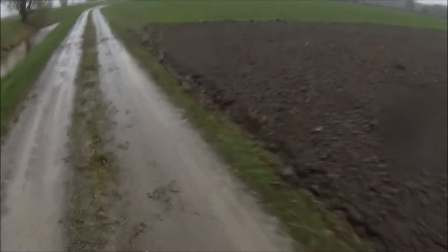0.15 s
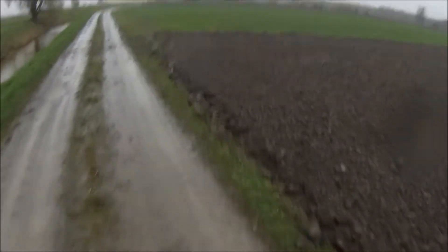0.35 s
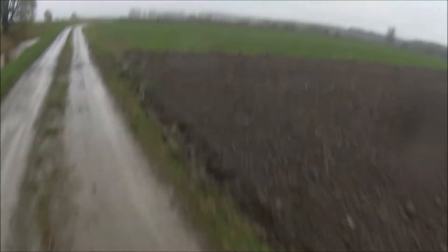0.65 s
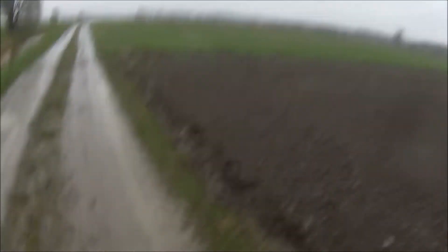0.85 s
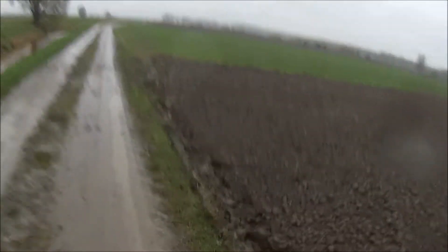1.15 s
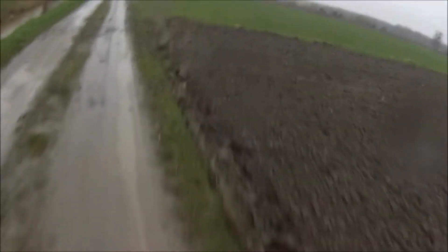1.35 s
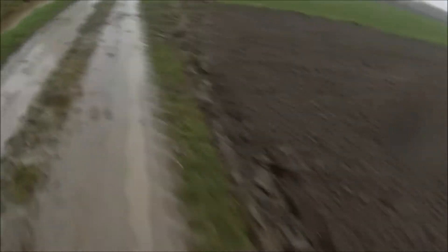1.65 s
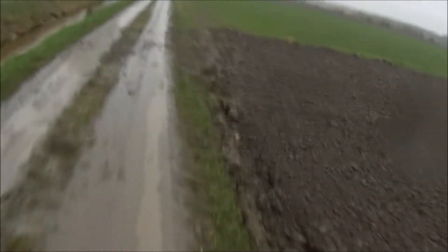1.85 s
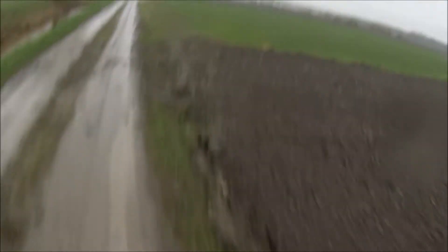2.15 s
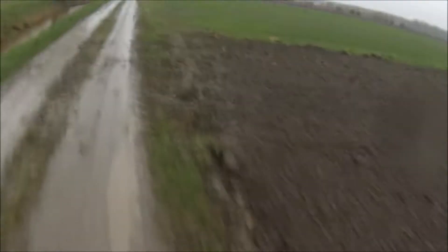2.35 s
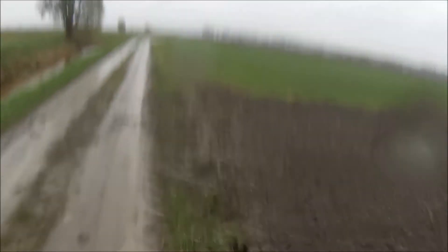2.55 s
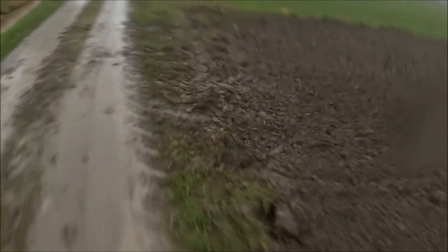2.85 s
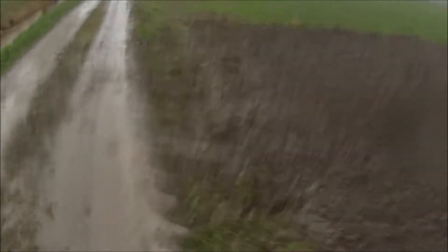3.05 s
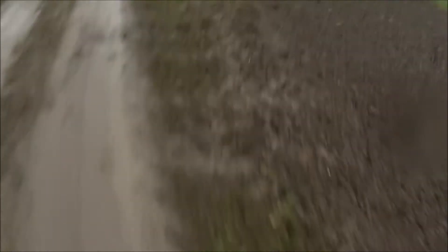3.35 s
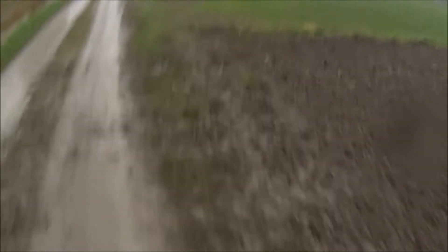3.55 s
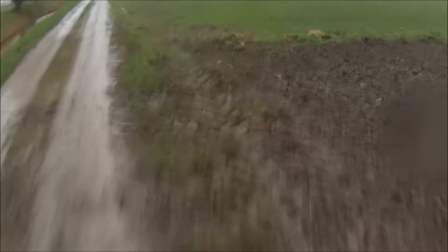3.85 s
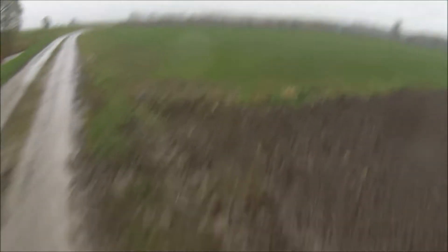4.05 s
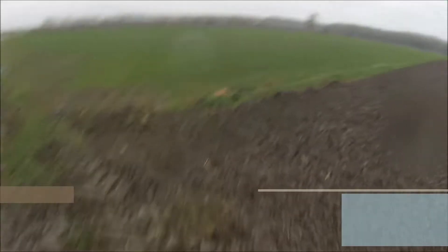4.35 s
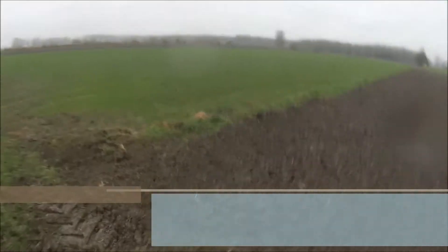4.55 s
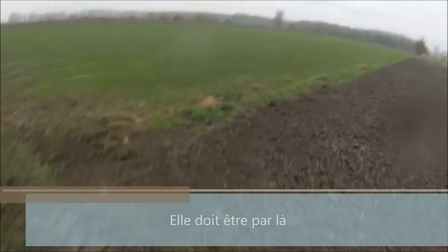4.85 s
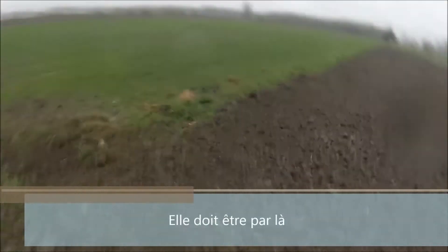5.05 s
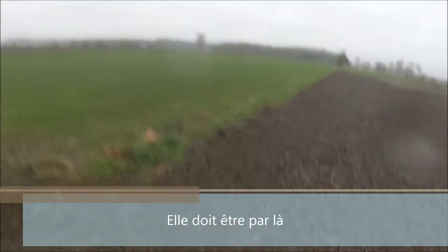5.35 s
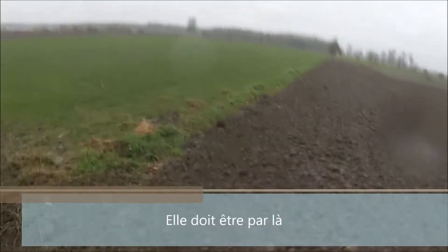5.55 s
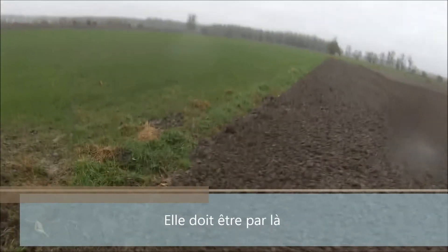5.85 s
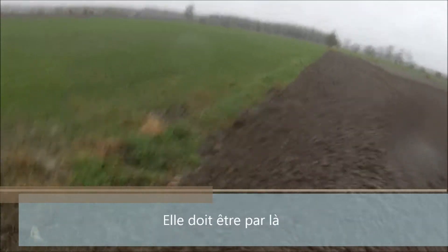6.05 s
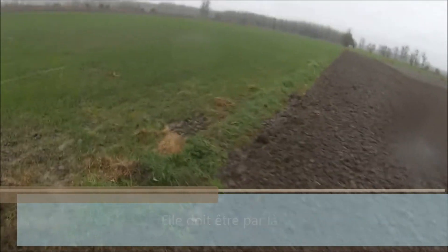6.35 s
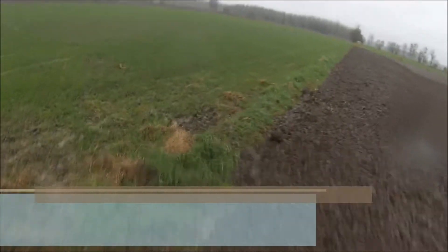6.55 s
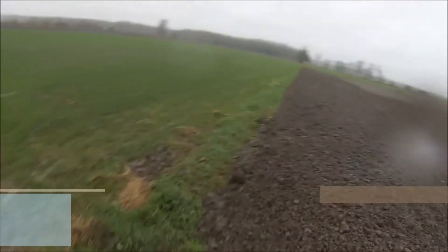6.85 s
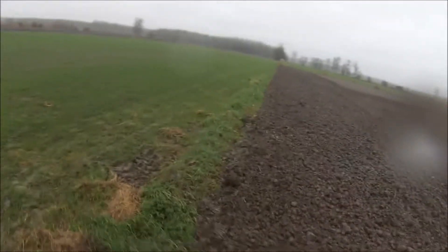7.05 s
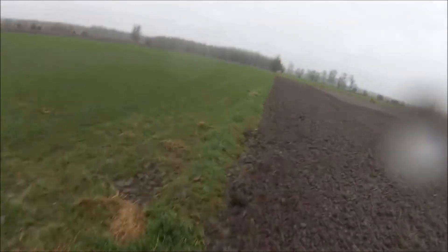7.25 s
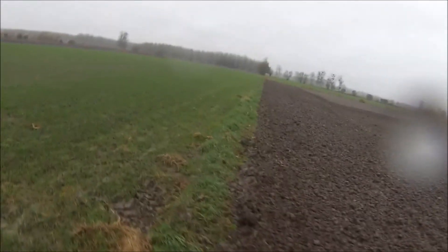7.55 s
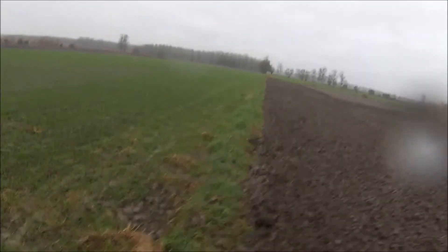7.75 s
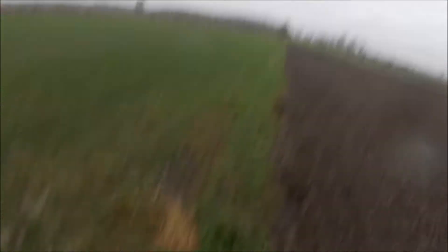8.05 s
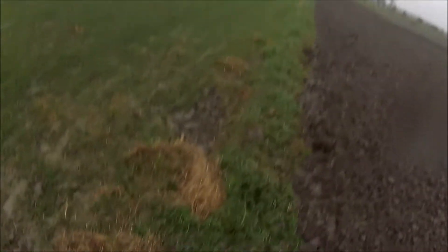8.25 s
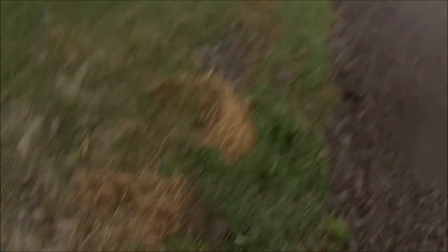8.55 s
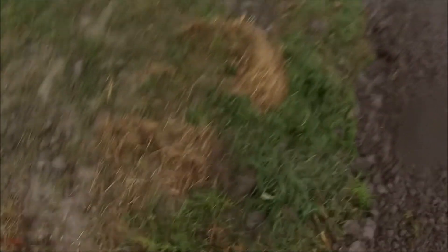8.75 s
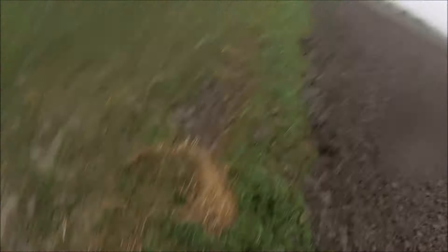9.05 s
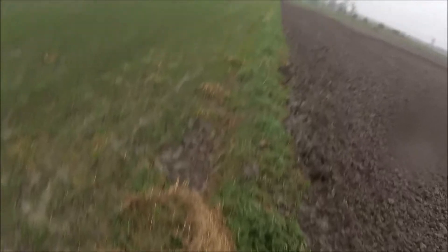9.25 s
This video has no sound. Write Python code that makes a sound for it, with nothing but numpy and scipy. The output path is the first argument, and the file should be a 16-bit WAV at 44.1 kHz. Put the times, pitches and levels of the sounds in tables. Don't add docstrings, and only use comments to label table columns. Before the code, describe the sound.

Microphone sealed inside a small plastic housing worn by a runner on a wet farm track. Deep, pressure-like footfall thuds come almost three a second, with muffled cloth rustle, low wind and dull wet grit. Raindrops tick, knock and crack very close on the shell. After about five seconds the steps slow and soften, then stop; hard isolated drops continue over faint hiss.

```python
import sys
import numpy as np
from scipy import signal
from scipy.fft import rfft, irfft
from scipy.io import wavfile
from scipy.ndimage import uniform_filter1d

SR = 44100
rng = np.random.default_rng(int(sys.argv[2]) if len(sys.argv) > 2 else 0)


def output_pcm(signal):
    pcm = np.clip(np.atleast_2d(signal).T, -1, 1) * 32767
    wavfile.write(sys.argv[1], SR, np.round(pcm).astype(np.int16))


def boost(x):
    u = np.asarray(x, float) / 20
    return 10 ** u


N = 415422

# frequency in Hz, level in dB per Hz.
HISS_COLOUR = [(59, -24), (100, 3.5), (138, -2.5), (389, -13.5), (424, -13), (818, -15), (872, -14.5),
               (1420, -11.5), (14700, -32), (16000, -38)]
# time in seconds, level in dB against a full run.
EFFORT = [(0.0, -15), (0.21, -7.5), (1.21, -2), (1.7, -9), (2.2, 0.52), (2.6, 0), (3.25, -1.5), (3.88, -7),
          (4.69, -5.5), (6.2, -9), (6.6, -22), (7.34, -23), (7.69, -8), (8.3, -23), (9.42, -24)]
# time in seconds, level in dB, spread in seconds.
LURCHES = [
    (0.02, -32.5, 0.037),
    (1.6, -26.5, 0.034),
    (2.3, -44, .2),
    (4.98, -71, 0.053),
    (5.5, -29, 0.061),
    (6.06, -33.5, 0.043),
    (6.58, -36, 0.055),
    (7.15, -39, 0.086),
    (7.9, -54.5, 0.18),
    (9.0, -55, 0.31),
]
# start in seconds, depth of the pressure dip in dB, swing in Hz, rebound delay in seconds.
STEPS = [(0.073, -6.5, 41, 0.04), (0.446, -16.5, 26.3, 0.051), (0.824, -11, 34.5, 0.06),
         (1.208, -14.5, 29.3, 0.059), (1.582, -8.5, 38.3, 0.045), (1.94, -14.5, 36.4, 0.091),
         (2.31, -10, 34, 0.052), (2.695, -8, 36.8, 0.039), (3.065, -12.5, 32, 0.058),
         (3.423, -21, 34.4, 0.072), (3.8, -12.5, 35.6, 0.033), (4.195, -9.5, 35, 0.036),
         (4.608, -6.5, 33.5, 0.036), (5.03, -12, 42, 0.023), (5.494, -29.5, 35.4, 0.055),
         (5.983, -16.5, 32.5, 0.037), (6.506, -31, 41.7, 0.05), (7.023, -28.5, 41.2, 0.072),
         (7.088, -32.5, 21, 0.055), (7.713, -32.5, 29, 0.037), (8.231, -38, 39, 0.029)]
# mode in Hz, level in dB, 60 dB decay in seconds.
KNOCK_MODES = [(1298, -9.5, 0.0036), (1654, 0.5, 0.0078), (2060, -13, 0.012), (2399, 1.5, 0.0033),
               (2720, 2, 0.0046), (3300, -15.5, 0.0011)]
# mode in Hz, level in dB, 60 dB decay in seconds.
CRACK_MODES = [(3900, 7.5, 0.0051), (4176, 8.5, 0.0057), (5640, 14, 0.0017), (6905, 12, 0.0017),
               (6980, 8.5, 0.003), (9630, 4, 0.0017), (10240, 4, 0.0014), (13400, -13.5, 0.004)]
# mode in Hz, level in dB, 60 dB decay in seconds.
RING_MODES = [(1860, -10.5, 0.13), (2148, -0.5, 0.058), (3070, -7.5, 0.049)]
# pitch in Hz, low thump and after-ring in dB against the peak.
FACES = [(1680, -12.5, -48), (1647, -14, -28), (2167, -8.5, -42), (2500, -19, -37.5), (3240, -21, -51)]
# start in seconds, peak in dB, crack in dB against the peak.
BACK = [(0.0831, -28, -16), (0.6107, -25, -18), (0.7935, -28, -14), (1.0667, -37, -16),
        (1.2883, -32.5, -12), (1.3117, -28, -6), (2.3053, -31, -23), (2.547, -36, -6), (3.089, -42.5, 0),
        (4.028, -28.5, 3.5), (4.094, -32.5, -4.5), (4.5693, -28, -12), (6.0518, -44, -16),
        (6.282, -31, -9.5), (6.681, -36.5, -42), (7.5962, -35, -16), (7.7347, -24, -10), (8.0597, -37, -27),
        (9.0309, -40.5, -16), (9.2972, -38, -3.5)]
# start in seconds, peak in dB, crack in dB against the peak.
FLANK = [(0.892, -42.5, -29), (1.4093, -25, -26), (1.4598, -21, -26), (1.8301, -24.5, -19),
         (2.0834, -32.5, -30), (2.348, -37, -24), (2.602, -23, -28), (3.2057, -32.5, -16),
         (3.4595, -35, -7), (3.5102, -26, -28), (3.756, -35.5, -6), (4.3573, -39.5, -8),
         (4.6148, -28.5, -12), (5.2058, -39.5, -7), (7.3013, -29, -6), (7.607, -37.5, -17),
         (7.9291, -24.5, -29), (9.1474, -29, -5), (3.6305, -44, -25), (3.715, -41.5, -18),
         (5.156, -43.5, -33), (6.648, -45, -21), (6.905, -44.5, -16)]
# start in seconds, peak in dB, crack in dB against the peak.
ROOF = [(0.1735, -34.5, -24), (1.135, -25.5, -15), (1.305, -30.5, -16), (1.5911, -39, -0.5),
        (2.0236, -33, -13), (2.1187, -37.5, -19), (2.17, -40, -30), (2.3116, -35, -26), (2.4045, -38.5, -9),
        (2.5576, -28, -6.5), (2.57, -37, -19), (3.1812, -41, 2), (3.2468, -35, -33), (3.962, -36.5, -18),
        (4.0358, -29.5, -24), (4.1982, -24.5, -21), (4.2405, -39.5, -2), (4.3738, -31.5, -11),
        (4.4827, -21.5, -29), (6.2322, -34, -8.5), (6.769, -34.5, -21), (7.399, -35.5, -10),
        (7.524, -28.5, -7), (7.582, -38, -30), (7.7085, -42, -15), (8.1175, -36.5, -4), (9.218, -36, -6.5)]
# start in seconds, peak in dB, crack in dB against the peak.
FRONT = [(0.8223, -40, 2.5), (3.3308, -28, -9), (4.3433, -41, -12), (4.5792, -27.5, -10),
         (5.4386, -38.5, -11), (5.5727, -35.5, -16.5), (5.8382, -40, -3.5), (5.8883, -41, -5),
         (5.972, -30.5, 0), (6.0995, -36.5, -6.5), (6.3631, -39, -13), (6.485, -38, -22), (7.5183, -32, 5),
         (8.016, -29, -6), (8.0904, -29.5, -7), (9.0797, -44, -16), (1.342, -46, -20), (1.4015, -42, -12),
         (1.6692, -47, -21), (2, -47, -12), (4.587, -41, -3), (9.052, -47, -15)]
# start in seconds, peak in dB, crack in dB against the peak.
RIM = [(0.4635, -48.5, 0), (1.791, -27.5, -3), (2.1288, -47, 1.5), (2.297, -50, 5.5), (2.7096, -47.5, 6),
       (2.7683, -42.5, 12), (2.8227, -23, 2.5), (3.4063, -63.5, 17), (3.48, -49, 8.5), (3.6238, -48, 5),
       (4.0542, -42, -2), (4.46, -46, 1), (4.734, -46, -1), (6.094, -48, -2.5), (7.767, -47, 0.5)]
# start in seconds, peak in dB, pitch of the struck spot in Hz,
# crack in dB against the peak, top of the crack in dB against its body.
HEAVY = [(1.0244, -15.5, 2550, -3, -2), (2.4689, -20.5, 3300, 5, 2.5), (3.1584, -15.5, 1870, -7, 0.1),
         (3.5388, -20, 2500, -1, -2), (3.588, -19.5, 1670, -29, 6), (4.1332, -19.5, 1656, -24.5, 0.1),
         (4.3791, -19.5, 1663, -14.5, -14), (4.8655, -17.5, 1620, -5, 5.5), (5.4057, -17.5, 2500, -5, 2),
         (6.316, -9, 2395, -10.5, 6), (6.3778, -9.5, 1620, -8.5, 9.5), (6.5827, -20, 2520, -7.5, 2.5),
         (6.6264, -17, 2410, -10.5, 7), (6.7783, -13.5, 2490, -9, -5.5), (6.9705, -11, 2510, -1, -7),
         (7.4137, -18.5, 2390, -2, 5), (7.667, -14.5, 2500, 2, 3), (8.624, -18, 1630, -7, -10),
         (8.8162, -4.5, 2400, -9.5, 6.5), (9.1754, -14, 2450, -6.5, 9)]


def rms_one(x):
    return x / np.sqrt(np.mean(x ** 2) + 1e-20)


def peak_one(rows):
    return rows / np.abs(rows).max(axis=1, keepdims=True)


def in_time(rows):
    s, *columns = np.transpose(rows)
    return [np.interp(np.arange(N) / SR, s, c) for c in columns]


def band(x, low_hz, high_hz, order=2):
    return signal.sosfilt(signal.butter(order, [low_hz, high_hz], "band", fs=SR, output="sos"), x)


def drift(rate_hz):
    r = np.exp(-80 * np.pi * rate_hz / SR)
    slow = signal.lfilter([1], [1, -2 * r, r * r], rng.standard_normal(N // 40 + 2002))[2000:]
    return np.interp(np.arange(N) / 40, np.arange(len(slow)), rms_one(slow))


def ring(x, hz, t60):
    r, w = boost(-60 / (t60 * SR)), 2 * np.pi * hz / SR
    return signal.lfilter([0, np.sin(w)], [1, -2 * r * np.cos(w), r * r], x + 1e-18)


def lobe(t, width):
    return np.exp(-.5 * (t / width) ** 2)


def hiss():
    hz = np.maximum(np.fft.rfftfreq(N, 1 / SR), 1)
    point_hz, point_db = np.transpose(HISS_COLOUR)
    colour = boost(np.interp(np.log(hz), np.log(point_hz), point_db))
    return boost(-63.5) * rms_one(irfft(rfft(rng.standard_normal(N)) * colour, N))


def wind(effort_db, stride_db):
    wind_db = -56.5 + 0.16 * effort_db + 0.63 * stride_db
    spray_db = -76.5 + 0.15 * effort_db
    noise = rng.standard_normal((2, N))
    low = boost(wind_db - 7.5 + 2.0 * drift(6.7)) * rms_one(band(noise[0], 110, 440, order=1))
    droplets = rms_one(band(noise[1] * boost(8.3 * drift(90)), 2300, 7300))
    return low + boost(spray_db - 2.5 + 6.3 * drift(42)) * droplets


def through_shell(x, hump_hz, bright_db):
    hump = ring(x, hump_hz, .006) - .8 * ring(x, 1.22 * hump_hz, .005)
    return rms_one(band(hump, 770, 5600)) + boost(bright_db) * rms_one(band(x, 1700, 7000, order=1))


def rustle(level_db):
    sizes = boost(13.0 * np.minimum(rng.exponential(1, N), 3)) * rng.choice([-1, 1], N)
    clicks = rms_one(sizes * (rng.random(N) < 300 * boost(5 * drift(5)) / SR))
    rub = rng.standard_normal(N) * boost(3 * drift(25))
    return boost(level_db) * rms_one(through_shell(1.1 * clicks + rub, hump_hz=1874, bright_db=-10.0))


def sway(effort_db):
    t = np.arange(N) / SR
    level = boost(-41 + 0.31 * effort_db) + sum(boost(db) * lobe(t - s, spread) for s, db, spread in LURCHES)
    rumble = rms_one(band(rng.standard_normal(N + SR), 13.0, 46.7, order=4)[SR:])
    return level * boost(-4.0 + 1.15 * drift(5.0)) * rumble


def footfalls():
    out, shake, after = np.zeros((3, N))
    for s, db, hz, delay in STEPS:
        overshoot = 0.15 - 0.0575 * db
        rebound_db = min(-6.5, -23.5 - db)
        at = slice(max(round((s - .16) * SR), 0), round((s + .2) * SR))
        t, half = np.arange(N)[at] / SR - s, .5 / hz
        flight = -.1 * lobe(t + 0.0922, 0.0092)
        swing = 0.34 * lobe(t + half, 0.4 * half) - lobe(t, 0.32 * half) + overshoot * lobe(t - half, 0.37 * half)
        rebound = -lobe(t - delay, 0.0045) + 0.92 * lobe(t - delay - .012, 0.0076)
        out[at] += boost(db) * (flight + swing + boost(rebound_db) * rebound)
        after[at] += boost(db) * lobe(t - .07, 0.044)
        shake[at] += boost(db) * lobe(t - .003, 0.014)
    noise = rng.standard_normal((2, N))
    wobble = boost(-26.5) * after * rms_one(band(noise[1], 25.0, 54.2, order=4))
    creak = boost(-39.0) * rms_one(band(noise[0], 27, 248))
    return out + wobble + shake * creak


def splashes():
    t, noise = np.arange(N) / SR, rng.standard_normal((3, N))
    grit = boost(5 * np.array([drift(120), drift(120), drift(120)]))
    dull = sum(boost(-42.5 + 1.1 * db) * lobe(t - s, 0.014) for s, db, *_ in STEPS)
    swish, flick = np.zeros((2, N))
    spread_db = -rng.standard_normal((len(STEPS), 2))
    for (s, db, *_), (first, second) in zip(STEPS, spread_db):
        bright_db = -65 + 5.4 * min(db + 29.5, 0)
        swish += boost(bright_db + first) * lobe(t - s + 0.023, 0.0055)
        flick += boost(bright_db + second) * lobe(t - s - 0.042, 0.013)
    muffled = through_shell(noise[0] * grit[0], hump_hz=1790, bright_db=-9.5)
    swish = swish * rms_one(band(noise[1] * grit[1], 6900, 10500, order=3))
    flick = flick * rms_one(band(noise[2] * grit[2], 2100, 7900))
    return dull * muffled + swish + flick


def drizzle(count):
    place, face = rng.random((count, 2)).T
    size, crack = rng.standard_normal((count, 2)).T
    swept = np.cumsum(boost(1.3 * in_time(EFFORT)[0]))
    s = .01 + np.interp(place, swept / swept[-1], np.arange(N) / SR)
    peak_db = -43.5 + 3.5 * np.minimum(size, .6)
    crack_db = -19 + 15 * np.minimum(crack, 1)
    return zip(s, peak_db, crack_db, (4 * face ** 1.3).astype(int))


def struck(splat, modes, near_hz, focus_db, strength):
    total = 0
    for k, (hz, db, t60) in enumerate(modes):
        level = boost(db - focus_db * np.abs(np.log2(hz / near_hz))) * strength[:, k]
        total = total + level * (-1) ** k * ring(splat, hz, t60)
    return total


def raindrops(rows, splat_s, ragged, focus_db, thump_db, tail_db):
    s, db, spot_hz, crack_db, top_db, low_db, ring_db = np.transpose(rows)[:, :, None]
    t = np.arange(2400) / SR
    chance = rng.standard_normal((len(s), 2 * len(t) + 17))
    splat = ragged * chance[:, :len(t)] * np.exp(-t / splat_s) - (t == 0)
    water = chance[:, len(t):2 * len(t)]
    strength = boost(1.6 * chance[:, -17:, None])

    spot = 0.91 * np.sin(2 * np.pi * spot_hz * t) * boost(-60 * t / 0.0069)
    knock = signal.fftconvolve(splat, spot, axes=1)[:, :len(t)]
    knock = knock + struck(splat, KNOCK_MODES, spot_hz, focus_db, strength)
    knock = peak_one(band(knock, 1073, 4640, order=3))
    crack = band(struck(splat, CRACK_MODES, 6500, 3, strength[:, 6:]), 3340, 16200)
    crack = peak_one(crack + (boost(top_db) - 1) * band(crack, 6500, 17800))
    after = peak_one(band(struck(splat, RING_MODES, 2150, 3, strength[:, 14:]), 1300, 4300))
    blow = -1. * (t == 0) * np.ones_like(s)
    thump = boost(low_db + thump_db) * peak_one(band(ring(blow, 1266, 0.0064), 112, 740, order=1))
    run_off = boost(tail_db + .5 * crack_db) * rms_one(band(water, 1100, 3700)) * np.exp(-t / 0.0047)

    body = np.roll(knock + thump, 12, axis=1) + boost(crack_db) * crack
    body = body + boost(ring_db + 16 + 0.12 * db) * after
    out = np.zeros(N + len(t))
    starts = np.round((s[:, 0] - .0006) * SR).astype(int)
    for start, tick in zip(starts, boost(db) * (body + run_off)):
        out[start:start + len(t)] += tick
    return out[:N]


def rain():
    light = [(*row, k) for k, rows in enumerate([BACK, FLANK, ROOF, FRONT, RIM]) for row in rows]
    light += list(drizzle(count=28))
    drops = list(HEAVY) + [(s, db, FACES[k][0], crack_db, 0) for s, db, crack_db, k in light]
    s, db, hz, crack_db, top_db = np.transpose(drops)
    face_hz, face_low_db, face_ring_db = np.transpose(FACES)
    low_db = np.interp(hz, face_hz, face_low_db)
    ring_db = np.interp(hz, face_hz, face_ring_db) + 0.42 * (crack_db + 11)
    rows = np.transpose([s, db, hz, crack_db, top_db, low_db, ring_db])
    db, crack_db = db[:, None], crack_db[:, None]
    small = np.clip((-29 - db) / 7, 0, 1)
    return raindrops(rows, splat_s=0.0017 + 0.00023 * small, ragged=.09 + 0.36 * small,
                     focus_db=9.5 - 0.41 * crack_db - 0.28 * (db + 18.5),
                     thump_db=-1.04 + 0.3 * small, tail_db=-20.0 + 3 * small - 0.31 * (db + 23))


def scene():
    effort_db, = in_time(EFFORT)
    stride_db = 3 * sum(lobe(np.arange(N) / SR - s, 0.069) for s, *_ in STEPS)
    air = hiss() + wind(effort_db, stride_db)
    cloth = rustle(-62 + effort_db + stride_db)
    return (air + cloth + sway(effort_db) + footfalls() + splashes() + rain())[None]


def starve(x, from_hz, need_db):
    top = irfft(rfft(x) * (np.fft.rfftfreq(N, 1 / SR) > from_hz), N)
    level_db = 10 * np.log10(uniform_filter1d(top ** 2, size=256) + 1e-14)
    return x - top * uniform_filter1d(.9 * (level_db < need_db), size=200)


def low_pass(x):
    return signal.sosfilt(signal.butter(12, 16550, fs=SR, output="sos"), x)


def record(dry):
    x = signal.sosfilt(signal.butter(1, 6, "high", fs=SR, output="sos"), dry)
    busy_db = 10 * np.log10(uniform_filter1d(x ** 2, size=1800) + 1e-14) + 13 * drift(12)
    x = starve(x, 12900, np.where(busy_db > -30, -74, -120))
    x = starve(x, 15400, -84)
    x = signal.sosfilt(signal.cheby2(12, 60, 16800, fs=SR, output="sos"), x)
    return low_pass(x)


dry = scene()
out = record(dry)
output_pcm(out)
```